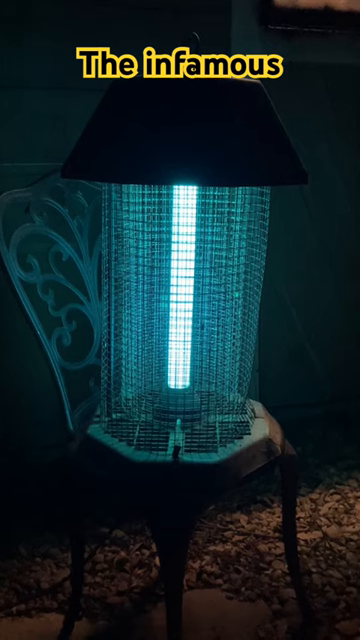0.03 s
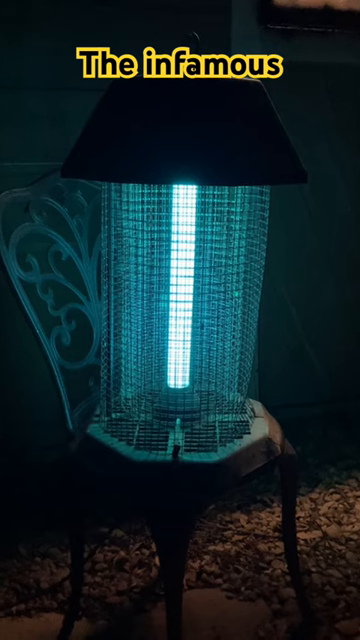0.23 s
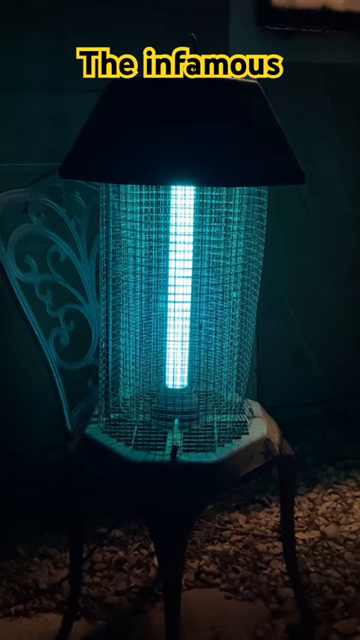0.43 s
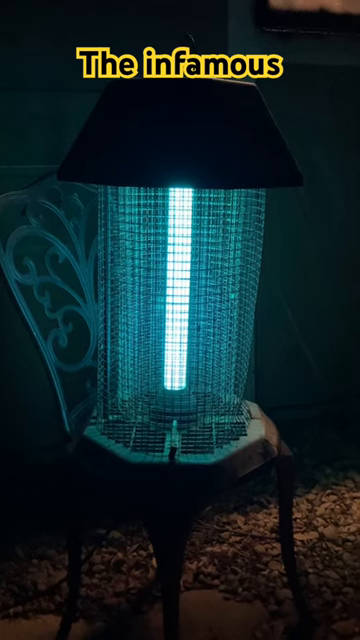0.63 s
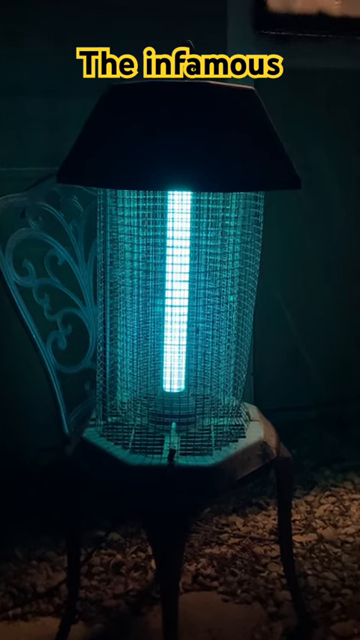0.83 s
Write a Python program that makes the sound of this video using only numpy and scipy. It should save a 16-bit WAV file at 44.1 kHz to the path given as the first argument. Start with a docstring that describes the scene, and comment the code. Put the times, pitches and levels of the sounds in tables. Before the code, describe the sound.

A bug zapper fires one loud, crackling electric zap with a small pop inside it, close by, and cuts off quickly. Faint cricket chirps, a rasping katydid and soft hiss carry on in a yard at night.

```python
"""A yard at night, where an insect flies into a bug zapper. For a fifth of a second the grid arcs:
a volley of sparks on every half-cycle of the mains, ringing in the cage and dying away outdoors,
and the insect pops. A cricket chirps in wing-stroke pulses over a far chorus and a katydid rasps
its file in short phrases, both louder until the zap. Soft bumps and two faint ticks sit in a bed
of low rumble and night hiss."""
import sys
import numpy as np
from scipy import signal
from scipy.fft import rfft, irfft
from scipy.io import wavfile
from scipy.ndimage import uniform_filter1d

SR = 44100
rng = np.random.default_rng(int(sys.argv[2]) if len(sys.argv) > 2 else 0)


def pcm_store(signal):
    """Save signal as 16-bit PCM."""
    levels = np.round(np.clip(np.atleast_2d(signal), -1, 1) * 32767)
    wavfile.write(sys.argv[1], SR, levels.astype(np.int16).T)


N = 114660
T = np.arange(N) / SR

# tone of the bed's rumble and hiss: f/Hz, level/dB
RUMBLE_EQ = [(20, -32.5), (45, 0), (80, 1.5), (130, -1.5), (200, -1.5), (320, -9), (500, -20), (900, -23.5),
             (1400, -22), (1900, -13), (3000, -34.5), (8000, -56.5)]
HISS_EQ = [(300, -43), (1400, -29.5), (2200, -1), (3000, -3), (4000, 2), (5200, -1), (7000, -3.5),
           (9000, -7), (11000, -20), (15500, -19)]
# their fader rides: t/s, level/dB
RUMBLE_RIDE = [(0, -57), (.2, -59), (.45, -73.5), (.65, -67.5), (.8, -70), (1.6, -69), (2, -63.5),
               (2.35, -63.5), (2.6, -68)]
HISS_RIDE = [(0, -58), (.2, -55), (.45, -66), (.7, -62.5), (.8, -68), (1.3, -65), (1.85, -65), (2.35, -68),
             (2.6, -63.5)]
# fader ride on katydid and crickets, ducking after the zap: t/s, gain/dB
INSECT_RIDE = [(.2, 11), (.3, 11), (.47, -8), (.58, -2)]

# katydid phrases: first stroke/s, last stroke/s, end level before the ride/dB, sizzle/dB, stroke depth/0-1
KATYDID_PHRASES = [(-.02, .18, -68, -23, 0.04), (0.565, .8, -76.5, 3, 0.34), (0.96, 1.153, -52, -12, 0.31),
                   (1.424, 1.707, -48.5, -3, .35), (1.807, 2.237, -67.5, -5, 0.5),
                   (2.514, 2.661, -52, -13, 0.36)]
# tone of the rasp and of the sizzle above it: f/Hz, level/dB
RASP_EQ = [(300, -55), (1500, -45), (2300, -9.5), (3000, -2), (4000, -4.5), (5000, 4), (6200, -2.5),
           (7600, -5.5), (9500, -18.5), (12000, -42), (15500, -26)]
SIZZLE_EQ = [(8000, -25.5), (11500, -37), (13000, 10.5), (15500, 8)]
# resonances of the katydid's wings: f/Hz, width/Hz, boost/dB
WING_MODES = [(2860, 70, 10), (5210, 60, 4), (5500, 120, -5), (5770, 90, 6), (6150, 50, 6), (7290, 60, 6),
              (7770, 70, 5), (8820, 90, 4), (10200, 120, 6)]
# cricket chirps: middle/s, level before trim and ride/dB, f/Hz
CRICKET_CHIRPS = [(.075, -48, 3410), (.2, -56, 3320), (.33, -51, 3400), (.613, -47, 3410),
                  (.875, -45.5, 3410), (1.145, -47, 3400), (1.395, -47, 3400), (1.625, -47.5, 3410),
                  (1.865, -47.5, 3400), (2.1, -47.5, 3380), (2.36, -46.5, 3400), (2.63, -47, 3400)]
# soft, close bumps: t/s, level/dB, f/Hz, half-length/s
SOFT_BUMPS = [(.022, -57, 45, .05), (.1, -55, 48, .028), (.258, -54, 65, .016), (.973, -51.5, 150, .0045),
              (1.232, -59.5, 65, .017), (2.136, -56.5, 72, .014)]

# strength of the arc, which nearly fails once: t/s, level/dB
ARC_STRENGTH = [(.215, 1), (.225, 0), (.25, 0), (.274, 4.5), (.282, -9.5), (.289, -0.5), (.32, -1),
                (.357, -0.5), (.368, -3), (.4, 0)]
# how far the voltage carries each volley: t/s, sparks/volley
VOLLEY_SIZE = [(.215, 1), (.224, 3), (.266, 3.6), (.276, 2.6), (.31, 3.2), (.335, 2.8), (.4, 2.6)]
# tone of one spark: f/Hz, level/dB
SPARK_EQ = [(60, -25), (450, -39.5), (800, -23.5), (1500, -12), (2600, -4), (3400, -16), (4000, -7.5),
            (5000, -5.5), (6500, -4), (8500, 5), (10300, 10.5), (12000, -11), (13500, 8.5), (15500, 0)]
# resonances of the cage and hood: f/Hz, width/Hz, boost/dB
CAGE_MODES = [(810, 55, 11), (1370, 40, 15), (1950, 70, 6), (2490, 45, 10), (2950, 90, 5), (3630, 70, 8),
              (4380, 50, 14), (4680, 110, 6), (5250, 95, 4), (5920, 120, 2), (7600, 50, 3), (8540, 60, 7),
              (8800, 35, 2), (9880, 55, 2), (10100, 55, 2), (14500, 50, 4), (14970, 50, 3)]
# midrange snap of the pop and the ticks: f/Hz, level/dB
POP_EQ = [(60, -6), (300, -35), (600, 5), (1300, 8.5), (2200, 1), (5000, -26.5)]
# faint ticks: t/s, level/dB
FAINT_TICKS = [(1.108, -71.5), (1.688, -67.5)]

BURST_WIDTH, NIGHT_WIDTH = .96, .67  # stereo width, see noise()


def from_db(db):
    """Decibels to gain."""
    return 10 ** (np.asarray(db) / 20)


def rms_one(x):
    """Scale to rms 1."""
    return x / np.sqrt(np.mean(x ** 2) + 1e-20)


def curve(rows, t=T):
    """Read a table of (t/s, value) at times t."""
    return np.interp(t, *np.transpose(rows))


def eq(x, points):
    """Minimum-phase EQ through the points; white noise keeps its power."""
    hz, db = np.transpose(points)
    bin_hz = np.arange(N + 1) * SR / (2 * N)
    gain = rms_one(from_db(np.interp(np.log(bin_hz + 1), np.log(hz), db)))
    cepstrum = irfft(np.log(gain))[:N] * np.where(np.arange(N) == 0, 1, 2)
    return irfft(rfft(x, 2 * N) * np.exp(rfft(cepstrum, 2 * N)))[..., :N]


def resonate(x, hz, width_hz):
    """Resonant band-pass with gain 1 at its peak."""
    return signal.lfilter(*signal.iirpeak(hz, hz / width_hz, fs=SR), x + 1e-18)


def boost(x, modes):
    """One bell filter for each resonance of a body."""
    for hz, width_hz, db in modes:
        x = x + (from_db(db) - 1) * resonate(x, hz, width_hz)
    return x


def noise(width):
    """Stereo white noise; width is the gain of each side's own noise against the shared centre."""
    return rms_one(rng.standard_normal(N) + width * rng.standard_normal((2, N)))


def narrow_noise(hz, band_hz, width):
    """Stereo noise around one pitch; rms 1."""
    return rms_one(resonate(resonate(noise(width), hz, band_hz), hz, band_hz))


def burst(start_s, t60_s):
    """Noise with a hard attack and an exponential decay."""
    return noise(BURST_WIDTH) * (T >= start_s) * from_db(-60 * np.maximum(T - start_s, 0) / t60_s)


def night_air():
    """The bed: far rumble and the hiss of far insects."""
    rumble = from_db(curve(RUMBLE_RIDE)) * eq(noise(width=1.2), RUMBLE_EQ)
    hiss = from_db(curve(HISS_RIDE)) * eq(noise(NIGHT_WIDTH), HISS_EQ)
    return rumble + hiss


def katydid(teeth_per_s=1100, stroke_s=.0508, swell_db_per_s=7.5, fade_s=.024):
    """A file of teeth clicks against the ringing wings, in phrases that swell towards their end."""
    teeth = rms_one((rng.random(N) < teeth_per_s / SR) * rng.choice([-1, 1], N))
    smeared = teeth + .6 * noise(width=6)
    rasp = rms_one(boost(eq(smeared, RASP_EQ), WING_MODES))
    sizzle = eq(noise(NIGHT_WIDTH), SIZZLE_EQ)
    out = 0
    for first, last, db, sizzle_db, depth in KATYDID_PHRASES:
        outside_s = np.maximum(0, np.maximum(first - T, T - last - fade_s / 2))
        strokes = 1 + depth * np.cos(2 * np.pi * (T - last) / stroke_s)
        swell = from_db(db + swell_db_per_s * np.minimum(T - last, 0))
        out += swell * np.exp(-outside_s / fade_s) * strokes * (rasp + from_db(sizzle_db) * sizzle)
    return out


def crickets(strokes_per_s=69, sag_hz=155, chirp_s=.132, trim_db=-2.5, spread_db=1, spread_hz=18):
    """A near cricket, its tone pulsing and sagging in pitch with each wing stroke, over a far chorus."""
    scrape = .35 * narrow_noise(3380, band_hz=300, width=1.6)
    near = 0
    for middle_s, db, hz in CRICKET_CHIRPS:
        stroke, phase = np.divmod(T * strokes_per_s + rng.random(), 1)
        per_stroke = rng.standard_normal((400, 2))[stroke.astype(int)]  # no two strokes alike
        louder, sharper = uniform_filter1d(per_stroke.T, size=200)
        pitch_hz = hz + spread_hz * sharper + sag_hz * (.5 - phase)
        tone = np.sqrt(2) * np.sin(2 * np.pi * np.cumsum(pitch_hz) / SR)
        fade_db = -9 * (2 * (T - middle_s) / chirp_s) ** 4
        pulses = 1 - .7 * np.cos(np.pi * phase) ** 2
        near += from_db(trim_db + db + spread_db * louder + fade_db) * pulses * (tone + scrape)
    chorus = from_db(-65) * narrow_noise(3380, band_hz=340, width=NIGHT_WIDTH)
    return near + chorus


def bumps():
    """Dull bumps: a few low cycles each, roughened with noise."""
    out = 0
    for at_s, db, hz, half_s in SOFT_BUMPS:
        thud = np.cos(2 * np.pi * hz * (T - at_s)) + .5 * narrow_noise(hz, 1.546 * hz, NIGHT_WIDTH)
        out += from_db(db) * np.exp(-((T - at_s) / half_s) ** 2) * thud
    return out


def sparks(start_s=.2149, end_s=.402, volleys_per_s=120, recharge_s=.0018, jitter_s=.00024):
    """Each mains half-cycle breaks the gap down, and again each time the grid has recharged."""
    trim_db, restrike_loss_db, spread_db = 1.5, 1.2, 1.3
    clicks = np.zeros(N)
    for volley_s in np.arange(start_s, end_s, 1 / volleys_per_s):
        chance = rng.standard_normal((6, 2))
        at_s = volley_s + jitter_s * chance[0, 0]
        count = int(round(curve(VOLLEY_SIZE, volley_s)))
        volley_db = trim_db + curve(ARC_STRENGTH, volley_s)
        for restrike, (later, louder) in enumerate(chance[1:1 + count]):
            clicks[int(at_s * SR)] += from_db(volley_db - restrike_loss_db * restrike + spread_db * louder)
            at_s += recharge_s * np.exp(.22 * later)
    return clicks


def reverb(x, predelay_s, t60_s):
    """Diffuse stereo reflections of a mono sound, wet only."""
    return signal.fftconvolve(x[None], rms_one(burst(predelay_s, t60_s)))[:, :N] / np.sqrt(N)


def zap():
    """The sparks arrive directly, scattered by the ringing cage, and as a short outdoor tail."""
    clicks = sparks()
    cage = from_db(-2) * reverb(clicks, predelay_s=.0005, t60_s=.033)
    yard = from_db(-14.5) * reverb(clicks, predelay_s=.006, t60_s=.2)
    return eq(boost(clicks + cage, CAGE_MODES) + yard, SPARK_EQ)


def insect_pop():
    """The insect pops in the arc: one tight midrange snap."""
    return from_db(-26) * eq(burst(start_s=.261, t60_s=.016), POP_EQ)


def ticks():
    """Faint, dry ticks of fast-fading noise."""
    return sum(from_db(db) * eq(burst(at_s, t60_s=.076), POP_EQ) for at_s, db in FAINT_TICKS)


def delay_right(x, lag_s):
    """The right side is delayed slightly against the left."""
    delay = np.exp(-1j * np.pi * np.arange(N + 1) * SR / N * lag_s)
    return np.array([x[0], irfft(rfft(x[1], 2 * N) * delay)[:N]])


def scene():
    """The mix: zapper, crickets and the rest of the night, each with its right side trailing the left by a
    fraction of a millisecond."""
    ride = from_db(curve(INSECT_RIDE))
    night = ride * katydid() + ticks() + bumps() + night_air()
    zapper = zap() + insect_pop()
    return delay_right(zapper, .00013) + delay_right(ride * crickets(), .0001) + delay_right(night, .000115)


def record(dry, allpass_hz=562, allpass_q=2.57, cutoff_hz=15850):
    """The master: an all-pass turns the left side's phase, and a steep low-pass trims the top."""
    left = dry[0] - 2 * resonate(dry[0], allpass_hz, allpass_hz / allpass_q)
    low_pass = signal.firwin(301, cutoff_hz, window="blackman", fs=SR)
    return signal.fftconvolve(np.array([left, dry[1]]), low_pass[None], "same")


dry = scene()
out = record(dry)
pcm_store(out)
```